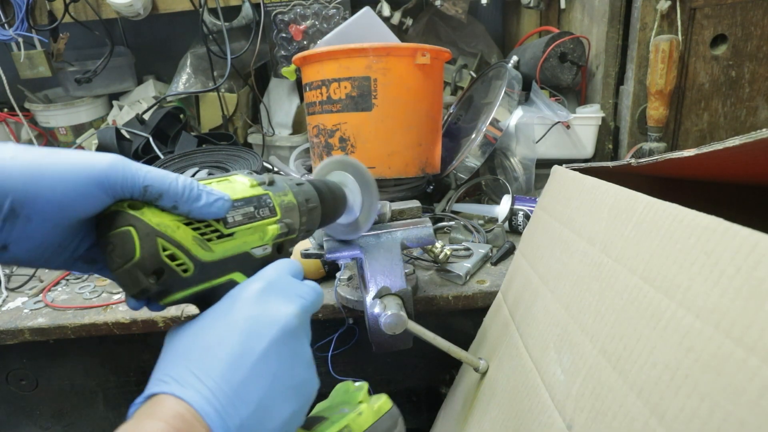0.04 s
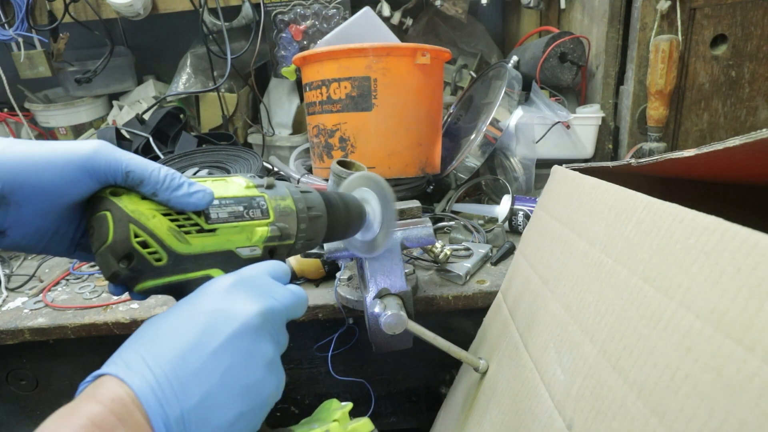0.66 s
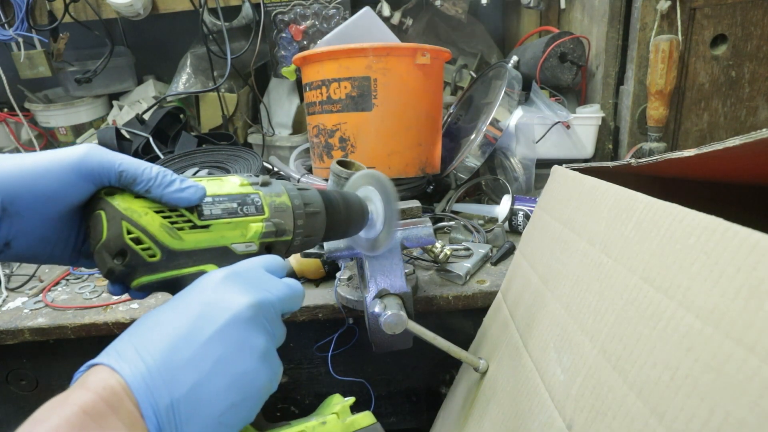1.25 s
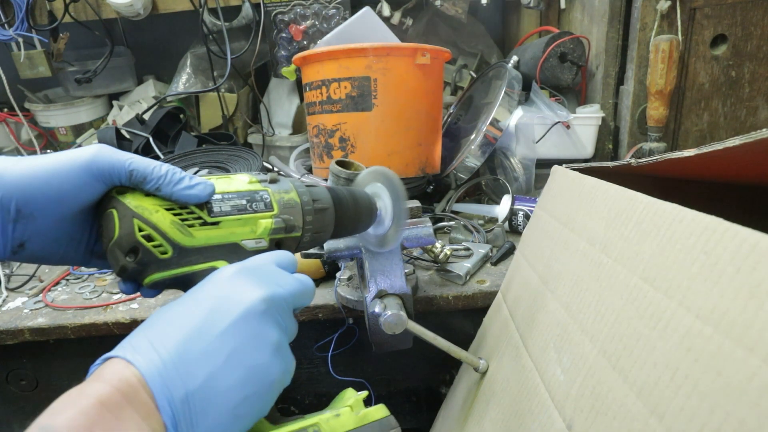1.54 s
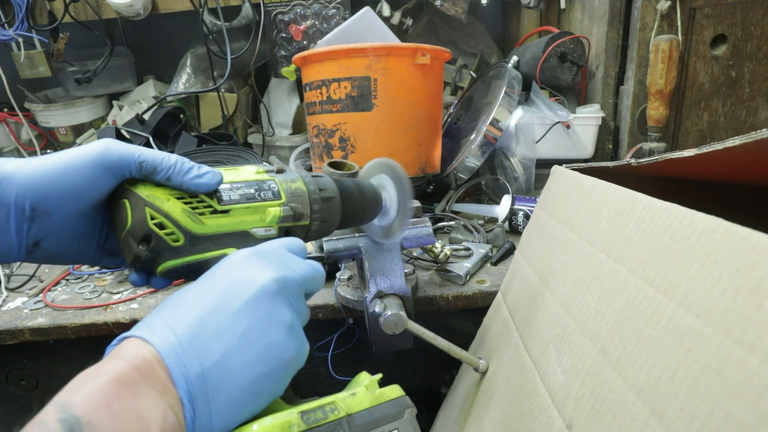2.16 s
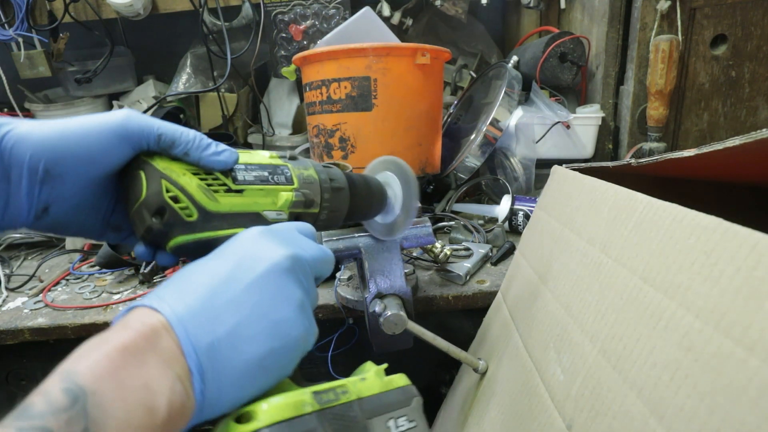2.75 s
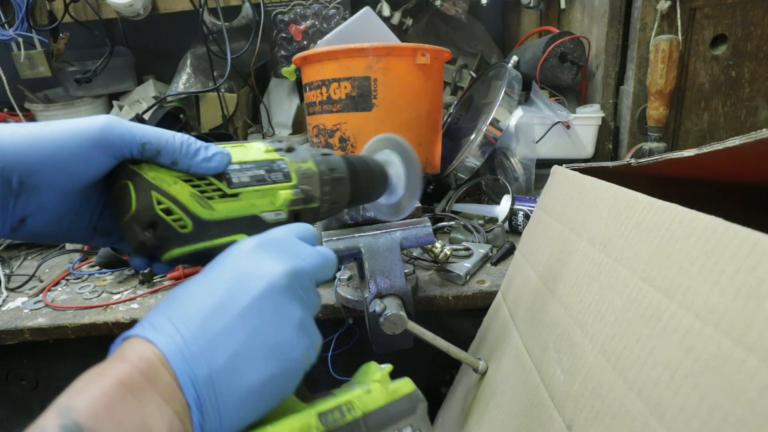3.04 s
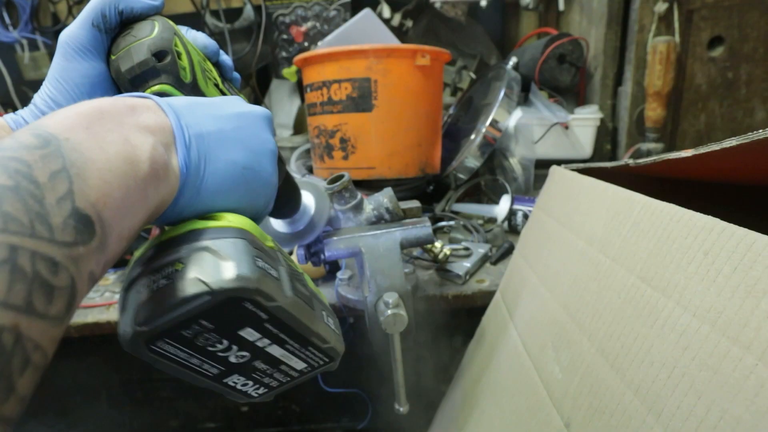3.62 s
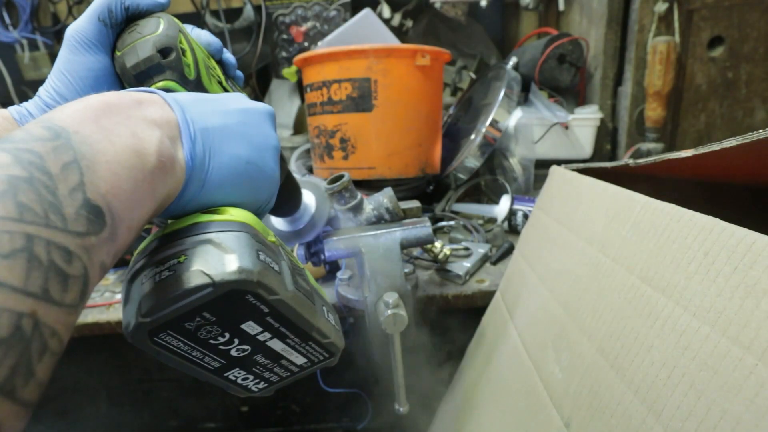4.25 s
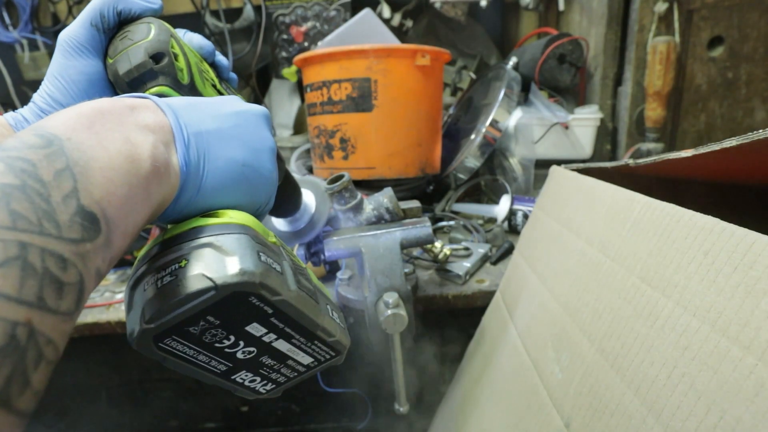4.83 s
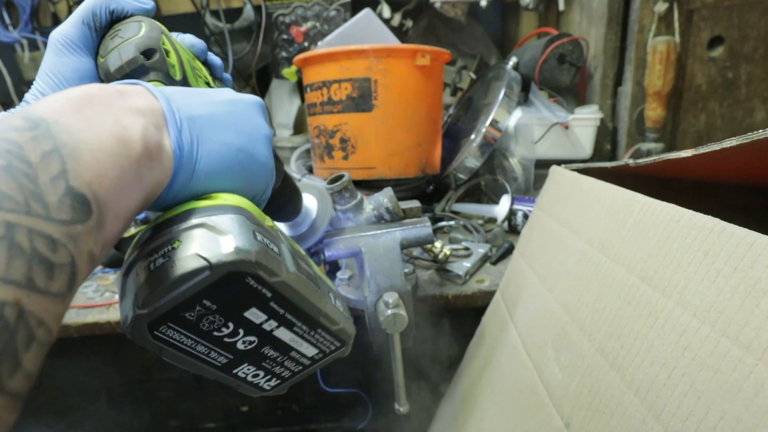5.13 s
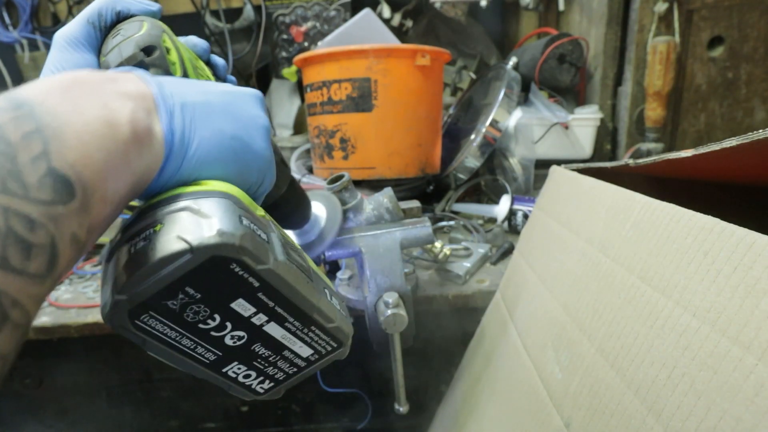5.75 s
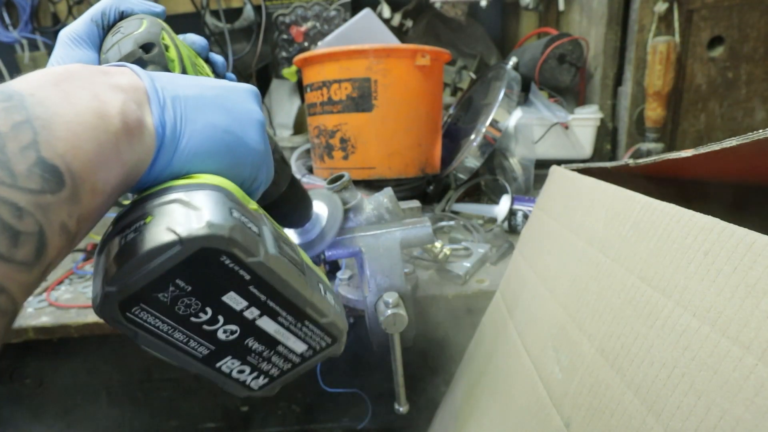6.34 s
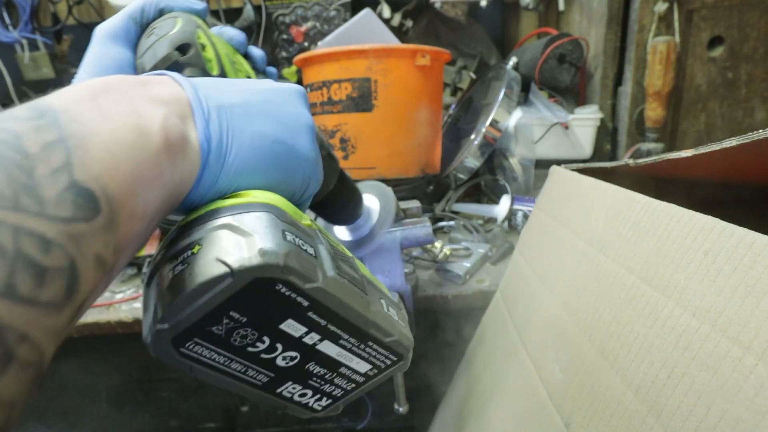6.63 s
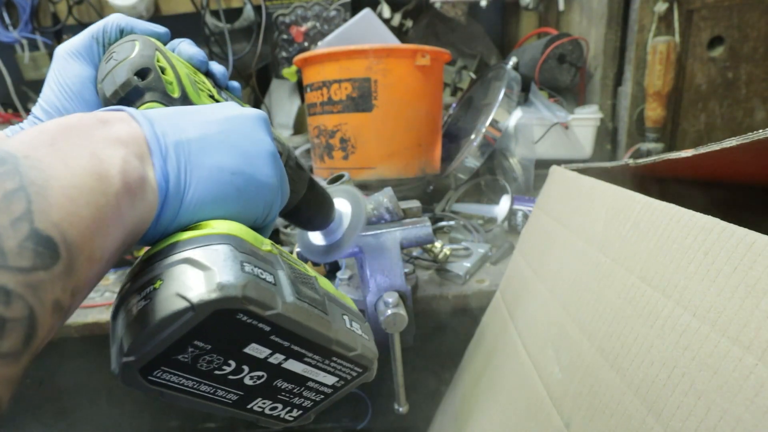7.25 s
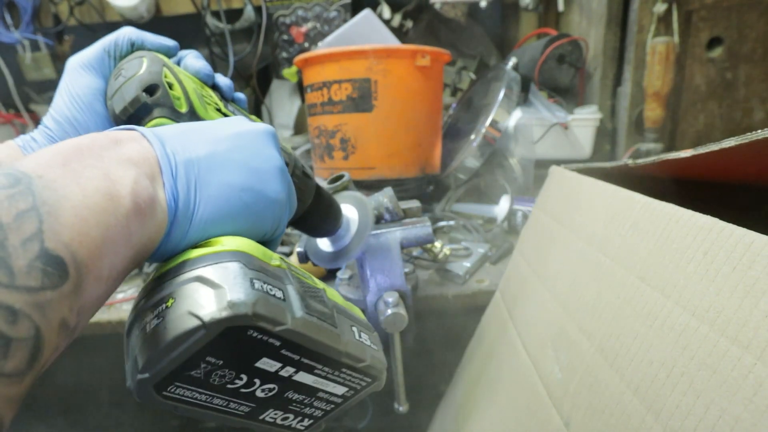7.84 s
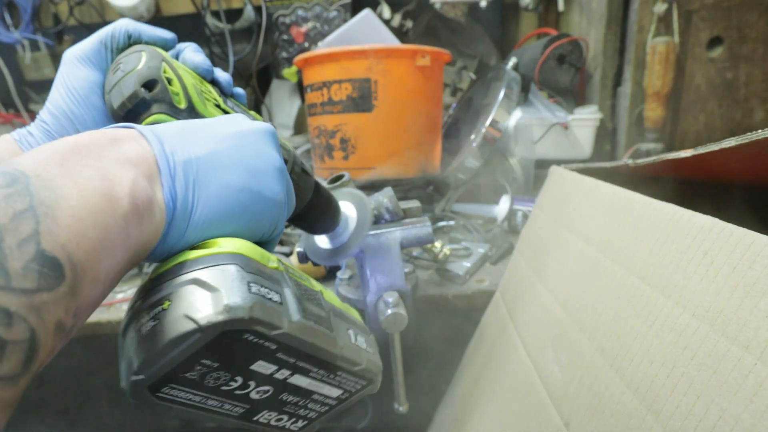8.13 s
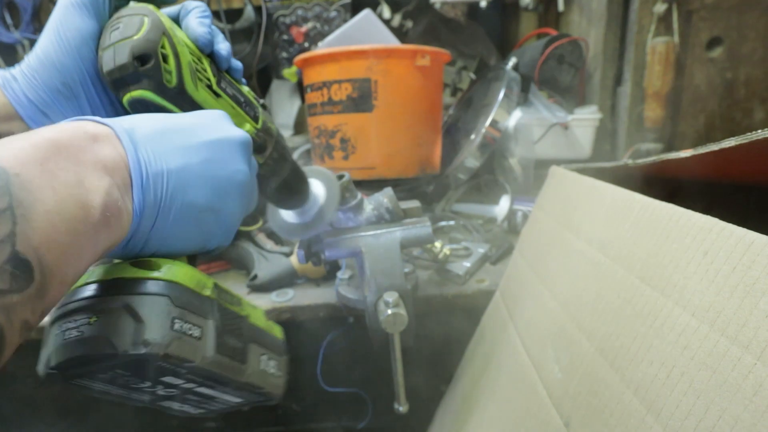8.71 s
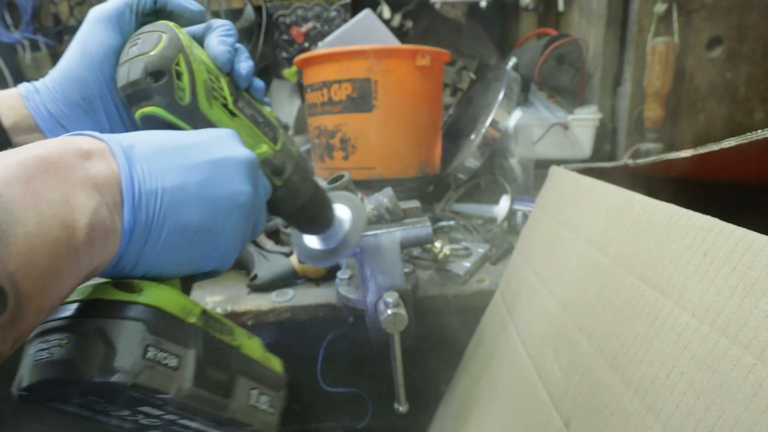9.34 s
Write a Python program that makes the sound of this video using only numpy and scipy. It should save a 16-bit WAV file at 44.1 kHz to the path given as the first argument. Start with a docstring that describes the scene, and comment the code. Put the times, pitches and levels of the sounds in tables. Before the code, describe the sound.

A cordless drill runs throughout, close and dry, spinning a wire wheel against a steel pipe held in a vice. From the start the wires make a bright, raspy scratch over the motor's whine and airy rush. The whine dips slightly under load and throbs, with light bench rattling around 2 seconds. The scrubbing eases near 3 seconds. At about 3.4 seconds the sound switches abruptly to harder, harsher grinding, with a lower motor pitch and a high metallic ring from the pipe. From 5.5 to 6.5 seconds the wheel chatters and slaps the metal, shaking the bench with rapid knocks and dull thuds. Lighter, hissing strokes follow until about 8.7 seconds, the whine rising and sagging with the pressure. The drill spins freely for a moment, then makes one last short, chattering contact between 9.1 and 9.3 seconds.

```python
"""A workshop bench: a cordless drill spins a wire wheel against a steel pipe held in a vice.
First it is held side-on; then an abrupt cut to end-on, pressing hard, chattering, then skimming.
The motor whines and sags under load, the wires scratch and ring the pipe,
and the uneven wheel shakes the bench once a turn."""
import sys
import numpy as np
from scipy import signal
from scipy.fft import rfft, irfft
from scipy.io import wavfile

SR = 44100
rng = np.random.default_rng(int(sys.argv[2]) if len(sys.argv) > 2 else 0)


def pcm_store(signal):
    """Save signal as 16-bit PCM."""
    levels = np.round(np.clip(np.atleast_2d(signal), -1, 1) * 32767)
    wavfile.write(sys.argv[1], SR, levels.astype(np.int16).T)


N = 418068
TIME = np.arange(N) / SR

# uneven bearing of the wheel: (time [s], throb depth [0-1])
UNEVENNESS = [(.6, 0), (1.1, 0.37), (1.65, 0.1), (2.1, 0.46), (3.3, 0.1), (5.2, 0.14), (6.4, 0.35),
              (7.0, 0), (8.3, 0.28), (8.8, 0)]
# wire bend, side-on: (time [s], bend [0-1])
WIRE_BEND = [(0, 0), (.55, 0.43), (.9, .8), (1.55, 0.99), (2.25, 0.73), (2.55, 0.4), (2.8, 0.65),
             (2.97, 0.2)]
# end-on strokes: (start [s], end [s], release [s], hard-bent wires [dB], tips [dB], gear whine [dB])
END_STROKES = [(3.296, 5.132, 0.18, -29, -48, -46), (5.189, 6.116, 0.15, -33, -35, -45.5),
               (6.165, 6.545, 0.068, -32.5, -34.5, -40), (6.624, 6.86, 0.065, -47, -36.5, -43),
               (6.875, 7.23, 0.13, -44, -34, -41), (7.246, 7.98, 0.092, -48, -33, -40.5),
               (8.017, 8.654, 0.04, -48, -32.5, -43), (9.063, 9.298, 0.048, -37.5, -42, -54)]


def amp(db):
    """Decibels to gain."""
    return 10 ** (np.asarray(db) / 20)


def unit(x):
    """Scale to rms 1."""
    return x / np.sqrt(np.mean(x ** 2) + 1e-20)


def curve(rows, column=1):
    """Table column, linear in time."""
    rows = np.asarray(rows)
    return np.interp(TIME, rows[:, 0], rows[:, column])


def held(start_s, end_s, release_s, attack_s=0.01):
    """Linear attack, hold, exponential release."""
    attack = np.clip((TIME - start_s) / attack_s, 0, 1)
    return attack * np.exp(-np.clip((TIME - end_s) / release_s, 0, 30))


def bump(at_s, half_s):
    """Gaussian swell."""
    return np.exp(-np.minimum(((TIME - at_s) / half_s) ** 2, 30))


def wander(cutoff_hz):
    """Smooth random drift, rms 1."""
    hz = np.fft.rfftfreq(N // 32, 32 / SR)
    slow = irfft(rfft(rng.standard_normal(N // 32)) / (1 + (hz / cutoff_hz) ** 4))
    return unit(np.interp(np.arange(N), np.linspace(0, N, len(slow)), slow))


def throb(turns, depth):
    """One swell a turn, constant mean power."""
    depth = np.clip(depth, 0, 1)
    return (1 + depth * np.cos(2 * np.pi * turns)) / np.sqrt(1 + depth ** 2 / 2)


def colour(x, spectrum, peaks=(), size=8192):
    """Minimum-phase filter, unit power gain: broad spectrum plus resonances and notches."""
    hz = np.fft.rfftfreq(size, 1 / SR)
    points_hz, points_db = np.transpose(spectrum)
    db = np.interp(np.log(hz + 1), np.log(points_hz), points_db)
    for centre_hz, width_hz, height_db in peaks:
        db += height_db / (1 + (2 * (hz - centre_hz) / width_hz) ** 2)
    cepstrum = irfft(np.log(amp(db)))
    cepstrum[1:size // 2] *= 2
    cepstrum[size // 2 + 1:] = 0
    response = irfft(np.exp(rfft(cepstrum)))[:size // 2]
    return signal.oaconvolve(x, response / np.linalg.norm(response))[:N]


def ring(x, hz, width_hz):
    """One mode, unit power gain for white drive."""
    radius = np.exp(-np.pi * width_hz / SR)
    pole = radius * np.exp(2j * np.pi * hz / SR)
    return np.sqrt(2 * (1 - radius ** 2)) * signal.lfilter([1], [1, -pole], x).real


def whine(turns, wheel, side_on):
    """Three raspy motor and gear whines; the lowest grows and throbs with the load."""
    # whine pitches: (order [x motor speed])
    orders = [10, 15, 14.7]
    # upper whines: (time [s], second whine [dB], third whine [dB])
    upper_db = [(0, -58, -68), (1.95, -45, -64), (2.95, -47, -63), (3.1, -43, -54), (3.36, -40, -55),
                (3.42, -47, -54), (5.7, -48, -60), (6.4, -50, -55), (6.75, -49, -44), (7.1, -62, -43.5),
                (7.65, -54, -43), (8.5, -58, -69), (9.48, -56, -67)]
    free_db, full_bend_db = -64, 26
    strain = amp(free_db + full_bend_db * curve(WIRE_BEND) * side_on)
    for start_s, end_s, release_s, _, _, whine_db in END_STROKES:
        strain = np.maximum(strain, amp(whine_db) * held(start_s, end_s, release_s) * ~side_on)
    strain *= throb(wheel, 1.5 * curve(UNEVENNESS))
    strain *= unit(amp(.9 * wander(18)))
    tones = 0
    for order, level in zip(orders, [strain, amp(curve(upper_db)), amp(curve(upper_db, column=2))]):
        rasp = unit(1 + .38 * wander(140)) * np.exp(.5j * wander(180))
        tones += level * (rasp * np.exp(2j * np.pi * order * turns)).real
    return np.sqrt(2) * tones


def gear_hum(turns, side_on):
    """Faint flickering motor and gear lines, locked to the shaft."""
    # lines: (order [x motor speed], side-on [dB], end-on [dB])
    lines = [(0.982, -72, -75.5), (2.01, -69, -69), (2.974, -64, -58.5), (4.67, -61, -58),
             (4.944, -76, -54.5), (12.12, -54.5, -73), (17.76, -66, -68), (23.9, -68, -77),
             (25, -51.5, -64), (29.6, -70, -56)]
    hum = 0
    for order, side_db, end_db in lines:
        level = amp(np.where(side_on, side_db, end_db)) * unit(amp(4 * wander(25)))
        hum += level * np.sin(2 * np.pi * order * turns)
    return np.sqrt(2) * hum


def fan(turns, side_on):
    """Rush of fan and gears, pulsing slightly each motor turn."""
    # rush: (time [s], level [dB])
    side_db = [(0, -36.5), (3.0, -42.5), (3.39, -42.5)]
    end_db = [(3.39, -41.5), (9.48, -43)]
    # rush spectra: (frequency [Hz], relative level [dB])
    side_spectrum = [(45.0, -34), (85.0, -25), (250.0, -23.5), (500.0, -17.5), (1000.0, -20.5),
                     (1700.0, -0.5), (2100.0, 0.5), (3200.0, -6.5), (5000.0, -6), (7000.0, -15),
                     (9500.0, -4), (12500.0, -13.5), (15600.0, -17)]
    end_spectrum = [(45.0, -41), (85.0, -27), (250.0, -28), (500.0, -14), (1000.0, -4), (1700.0, 0.0),
                    (2100.0, -14.5), (3200.0, -12), (5000.0, -5.5), (7000.0, -11.5), (9500.0, -6.5),
                    (12500.0, -9), (15600.0, -22)]
    # resonances, notches: (centre [Hz], width [Hz], height [dB])
    side_peaks = [(580, 69, 5), (866, 470, 19), (1016, 44, 11.5), (1340, 290, 11), (1667, 160, 11.5),
                  (1877, 257, -24.5), (2750, 25, -1), (3370, 77, 7.5), (4067, 250, 16.5), (5120, 740, 17.5),
                  (6820, 960, 16.5), (10450, 500, -17)]
    end_peaks = [(560, 24, 3.7), (822, 39, 9.7), (1218, 28, 13.5), (1373, 19, 4.8), (1818, 71, 10.6),
                 (2430, 58, 9.7), (2900, 91, 2.6), (3440, 58, 17.3), (3920, 680, 6.7), (4970, 150, 9.4),
                 (6100, 390, 15.4), (8000, 1900, 10)]
    air = rng.standard_normal(N) * throb(turns, 0.085) * amp(1.2 * wander(40))
    side = colour(air * side_on * amp(curve(side_db)), side_spectrum, side_peaks)
    end = colour(air * ~side_on * amp(curve(end_db)), end_spectrum, end_peaks)
    return side + end


def pressing(side_on):
    """Strength of three contacts: side-on wires, end-on wires bent hard, skimming tips."""
    # one long side-on stroke: (time [s], level [dB])
    scrub_db = [(0, -34), (.3, -29.5), (.5, -31), (1.3, -32), (2.0, -34.5), (2.76, -35.5), (2.97, -45.5),
                (3.39, -40)]
    # wires snag and dig in: (time [s], peak [dB])
    snags = [(3.05, -39.5), (5.64, -35), (5.81, -34), (6.66, -38), (7.39, -30.5), (8.63, -32.5),
             (9.11, -34), (9.22, -38)]
    graze_hard_db, graze_tips_db = -50, -64.5  # stray wires between strokes
    snag_power = sum((amp(db) * bump(at_s, half_s=0.046)) ** 2 for at_s, db in snags)
    side_power = amp(curve(scrub_db)) ** 2 + snag_power
    hard_power = amp(graze_hard_db) ** 2 + snag_power
    tips_power = amp(graze_tips_db) ** 2
    for start_s, end_s, release_s, hard_db, tips_db, _ in END_STROKES:
        stroke = held(start_s, end_s, release_s)
        hard_power += (amp(hard_db) * stroke) ** 2
        tips_power += (amp(tips_db) * stroke) ** 2
    return np.sqrt(side_power) * side_on, np.sqrt(hard_power) * ~side_on, np.sqrt(tips_power) * ~side_on


def wire_clicks(wheel, spread_db, jitter_s, count=600):
    """The same wires strike each turn, each a little early or late."""
    wire = np.floor(wheel * count).astype(int)
    at = np.flatnonzero(np.diff(wire))
    polarity = rng.choice([-1., 1.], count)[wire[at] % count]
    force, delay = rng.standard_normal((len(at), 2)).T
    at = np.clip(at + np.round(delay * jitter_s * SR).astype(int), 0, N - 1)
    return unit(np.bincount(at, polarity * amp(spread_db * force), N))


def scratching(wheel, press):
    """Wires flick across the pipe, harder once a turn; end-on they also ring it and sing."""
    # scratch spectra: (frequency [Hz], relative level [dB])
    side_spectrum = [(45.0, -53), (85.0, -47), (250.0, -20), (500.0, -17.5), (1000.0, -6), (1700.0, -6.5),
                     (2100.0, -12), (3200.0, 3), (5000.0, -13), (7000.0, -12), (9500.0, -11),
                     (12500.0, -40), (15600.0, -30)]
    hard_spectrum = [(45.0, -45), (85.0, -37), (250.0, -16), (500.0, -6.5), (1000.0, -14.5),
                     (1700.0, -17.5), (2100.0, -6.5), (3200.0, 1.5), (5000.0, -0.75), (7000.0, -5),
                     (9500.0, -17.5), (12500.0, -22), (15600.0, -32)]
    tips_spectrum = [(45.0, -67), (85.0, -34), (250.0, -31.5), (500.0, -16), (1000.0, -11), (1700.0, -11),
                     (2100.0, -23), (3200.0, -4.5), (5000.0, 5), (7000.0, -26), (9500.0, -16),
                     (12500.0, -23.5), (15600.0, -33)]
    # resonances, notches: (centre [Hz], width [Hz], height [dB])
    side_peaks = [(567, 48, 12.5), (820, 48, 9), (1610, 116, 9.5), (1985, 51, 11), (2320, 790, 0.5),
                  (3064, 105, -30), (4320, 310, 9), (5216, 1140, 16.5), (6780, 2500, 15.5),
                  (7460, 540, -31), (8210, 220, 12), (10570, 870, 12), (13100, 1150, 29)]
    hard_peaks = [(745, 97, 9.5), (906, 220, 10), (1142, 98, 9), (1344, 210, 10.5), (1530, 155, 13),
                  (1762, 190, 16), (1950, 40, 6), (2480, 260, -6), (4210, 250, 6), (5050, 170, 3),
                  (11900, 1200, 8.5), (14715, 132, 8)]
    tips_peaks = [(550, 24, 6), (766, 62, 9.5), (905, 23, 9.5), (1180, 32, -27), (1576, 50, 6),
                  (1886, 540, 12.5), (2300, 170, 6.5), (2810, 155, 10.5), (3860, 130, 7),
                  (4385, 810, -30.5), (6760, 1570, 16), (8050, 960, 10.5), (14714, 150, 8)]
    on_side, on_hard, on_tips = press
    hand_db = .5 * wander(23)
    flicker_db = .59 * wander(24) + .5 * wander(300)
    contact = throb(wheel, .3 * curve(UNEVENNESS)) * unit(amp(hand_db + flicker_db))
    side = wire_clicks(wheel, spread_db=3.5, jitter_s=.0005) * contact * on_side
    hard = wire_clicks(wheel, spread_db=2.5, jitter_s=.0004) * contact * on_hard
    tips = wire_clicks(wheel, spread_db=6, jitter_s=.0006) * contact * on_tips
    scratch = amp(-1.53) * growl(colour(side, side_spectrum, side_peaks), wheel)
    scratch += amp(-1.24) * colour(hard, hard_spectrum, hard_peaks)
    scratch += amp(-1.65) * colour(tips, tips_spectrum, tips_peaks)
    return scratch + pipe_ring(hard, tips) + singing(wheel, contact * np.hypot(on_hard, on_tips))


def growl(scratch, wheel, straight_db=-15.5, full_bend_db=21):
    """Side-on scratch is hollow at first touch; its middle swells and chops with the load."""
    band = signal.butter(3, [2000, 3150], "bandpass", fs=SR, output="sos")
    middle = signal.sosfiltfilt(band, scratch)
    swell = amp(straight_db + full_bend_db * curve(WIRE_BEND))
    return scratch - middle + middle * swell * throb(wheel, .45 * curve(UNEVENNESS))


def tuft_drone(wheel, press):
    """Thick tufts pass every turn and hum on wheel harmonics."""
    # harmonics: (order [x wheel speed], gain on side-on contact [dB], gain on hard contact [dB])
    harmonics = [(4, -54, -63), (5, -47.5, -63), (7, -52, -39.5), (8, -75, -45.5), (10, -55, -42),
                 (12, -58, -34), (14, -73, -46)]
    on_side, on_hard, _ = press
    hum = 0
    for order, side_db, hard_db in harmonics:
        level = (on_side * amp(side_db) + on_hard * amp(hard_db)) * amp(1.5 * wander(6.8))
        hum += level * np.sin(2 * np.pi * order * wheel + 0.73 * wander(6.9))
    return hum


def shaking(wheel, side_on, press, smooth_rattle_db=-32):
    """The bouncing wheel rattles vice and bench; at times it chatters, knocking once a turn, with some knocks
    much louder."""
    # chatter bouts: (start [s], end [s], rise [s], release [s], rattle [dB], knock [dB])
    chatters = [(0.115, 0.376, 0.19, 0.12, -40.5, -50), (1.3, 1.44, .12, 0.036, -57.5, -56),
                (1.78, 2.23, 0.28, 0.14, -49.5, -43), (2.6, 2.83, 0.13, 0.073, -56, -64),
                (3.38, 4.15, 0.017, 0.11, -47, -63), (5.477, 6.563, 0.032, .03, -40, -37.5),
                (8.1, 8.3, .1, .15, -56, -54), (9.062, 9.326, 0.024, 0.12, -45, -41.5)]
    # the loudest knocks, same blow as the rest: (time [s], relative peak [dB])
    loud_knocks = [(5.51, -27), (5.606, -20), (5.659, -20), (5.756, -22), (5.936, -19), (6.229, -25),
                   (6.356, -21), (6.543, -20), (9.102, -21), (9.196, -19.5), (9.293, -22)]
    # bench spectra: (frequency [Hz], relative level [dB])
    side_spectrum = [(45.0, -54), (90.0, -13), (190.0, -11.5), (400.0, 1), (900.0, 0.5), (1600.0, -16.5),
                     (3000.0, -12), (15600.0, -61)]
    end_spectrum = [(45.0, -33), (90.0, -21.5), (190.0, -9), (400.0, -5), (900.0, 8), (1600.0, -14.5),
                    (3000.0, -11.5), (15600.0, -66)]
    # resonances, notches: (centre [Hz], width [Hz], height [dB])
    side_peaks = [(212, 42, 10), (885, 47, -3), (1154, 22, -24)]
    end_peaks = [(484, 30, -35), (632, 41, -21), (752, 78, 6.5), (915, 123, 16.5), (920, 260, -20.5)]
    bounce = unit(throb(wheel, .75 * curve(UNEVENNESS)) * amp(0.44 * wander(40)))
    shake = amp(smooth_rattle_db) * np.linalg.norm(press, axis=0)
    knocking = 0
    for start_s, end_s, rise_s, release_s, rattle_db, knock_db in chatters:
        bout = held(start_s, end_s, release_s, rise_s)
        shake = np.hypot(shake, amp(rattle_db) * bout)
        knocking += amp(knock_db) * bout
    loud_knocking = amp(-13) * sum(amp(db) * bump(at_s, half_s=0.0084) for at_s, db in loud_knocks)
    force = np.linalg.norm([bounce * shake, knocking * knocks(wheel), loud_knocking], axis=0)
    blows = wire_clicks(wheel, spread_db=5, jitter_s=0.002102, count=160) * force
    side = colour(blows * side_on, side_spectrum, side_peaks)
    end = colour(blows * ~side_on, end_spectrum, end_peaks)
    return side + end + sizzle(wheel, shake * side_on)


def sizzle(wheel, shake):
    """Wires flick free as the wheel bounces."""
    # sizzle spectrum: (frequency [Hz], relative level [dB])
    spectrum = [(2000, -35), (6000, -25), (8500, 7), (11000, 10), (13500, -13), (15600, -11)]
    flicks = wire_clicks(wheel, spread_db=4.5, jitter_s=.0005)
    return amp(-5) * colour(flicks * shake, spectrum)


def knocks(wheel, half_s=0.0082, spread_db=2.3):
    """Force envelope: the rim's high spot strikes once a turn, with random strength."""
    turn = np.round(wheel).astype(int)
    offset_s = (wheel - turn) / np.gradient(wheel) / SR
    force = amp(spread_db * rng.standard_normal(256))
    return force[turn % len(force)] * np.exp(-(offset_s / half_s) ** 2)


def bench_thuds(width_hz=44):
    """Dull thuds of the bench: swells of low narrow-band noise."""
    # thuds: (time [s], peak [dB], half length [s], frequency [Hz])
    thuds = [(.36, -58.5, 0.09, 125), (.34, -49.5, 0.11, 201), (2.376, -53.5, 0.073, 209),
             (5.51, -44, .025, 192), (5.84, -50, 0.032, 79), (5.95, -46, 0.18, 207), (5.99, -61, 0.089, 85),
             (8.216, -68, 0.086, 111), (9.118, -46.5, 0.034, 241), (9.34, -52, .03, 205)]
    sound = 0
    for at_s, db, half_s, hz in thuds:
        boom = ring(rng.standard_normal(N), hz, width_hz)
        boom = unit(ring(boom, hz, width_hz))
        sound += amp(db) * bump(at_s, half_s) * boom
    return sound


def pipe_ring(hard, tips):
    """End-on wire strikes drive the pipe's sharp modes."""
    # modes: (frequency [Hz], width [Hz], gain on hard wires [dB], gain on tips [dB])
    modes = [(3653, 48, -18.5, -39), (7355, 60, -18, -34), (10295, 55, -25, -20), (14622, 60, -34, -34)]
    # how freely the pipe rings under hard wires: (time [s], gain [dB])
    freedom_db = [(3.39, 5.5), (5.2, -0.5), (5.6, 1), (9.48, -11)]
    push = hard * amp(curve(freedom_db))
    return sum(ring(push * amp(hard_db) + tips * amp(tips_db), hz, width_hz)
               for hz, width_hz, hard_db, tips_db in modes)


def singing(wheel, contact):
    """Wire ends sing near 5 kHz as they bite."""
    # bite: (time [s], gain on contact [dB])
    bite_db = [(3.9, -15), (4.3, -6), (5.1, -6), (5.35, -16), (6.55, -7.5), (6.7, -3.5), (7.6, -10),
               (8.6, -14.5)]
    clicks = wire_clicks(wheel, spread_db=3, jitter_s=.0005)
    broad = ring(clicks, hz=4520, width_hz=730)
    return unit(ring(broad, hz=5090, width_hz=280)) * contact * amp(curve(bite_db))


def scene():
    """The motor turns the wheel through its gears; same sound on both channels."""
    # motor speed, sagging under load: (time [s], speed [turns/s])
    side_speed = [(0.0, 281.0), (0.55, 281.0), (0.8, 273.0), (1.05, 276.2), (1.38, 268.8), (1.65, 271.8),
                  (1.85, 274.5), (2.12, 271.0), (2.4, 275.2), (2.88, 278.2), (3.18, 283.5), (3.38, 283.0)]
    end_speed = [(3.39, 257.2), (5.03, 257.5), (5.52, 268.0), (6.12, 269.0), (6.33, 260.0), (6.56, 261.8),
                 (6.68, 281.0), (7.16, 282.8), (7.43, 266.8), (7.56, 276.2), (7.7, 272.2), (8.27, 267.0),
                 (8.4, 258.0), (8.65, 256.0), (8.8, 280.5), (9.0, 284.0), (9.28, 272.0), (9.48, 282.0)]
    # part of the rim that bears hardest: (time [s], angle [turns])
    high_spot = [(1.3, .68), (1.75, .45), (2.4, .66), (2.8, .46), (5.6, .7), (6.5, .82), (7.7, 1.05),
                 (8.4, 1.1), (9.2, 1.57)]
    cut_s, gear_ratio = 3.39, 13.17
    side_on = TIME < cut_s
    turns = np.cumsum(curve(side_speed + end_speed)) / SR
    wheel = turns / gear_ratio - curve(high_spot)  # [turns]
    shaft = turns + 0.011 * wander(26)  # gear play
    press = pressing(side_on)
    mono = whine(shaft, wheel, side_on) + gear_hum(shaft, side_on) + fan(shaft, side_on)
    mono += scratching(wheel, press) + tuft_drone(wheel, press)
    mono += shaking(wheel, side_on, press) + bench_thuds()
    return np.array([mono, mono])


def record(dry):
    """The microphone thins the deep bass; then a steep band limit."""
    low_hz, high_hz = 52, 15750
    thin = signal.sosfilt(signal.butter(4, low_hz, "highpass", fs=SR, output="sos"), dry)
    lowpass = signal.firwin(1023, high_hz, window=("kaiser", 9), fs=SR)
    return signal.oaconvolve(thin, lowpass[None], "same")


dry = scene()
out = record(dry)
pcm_store(out)
```